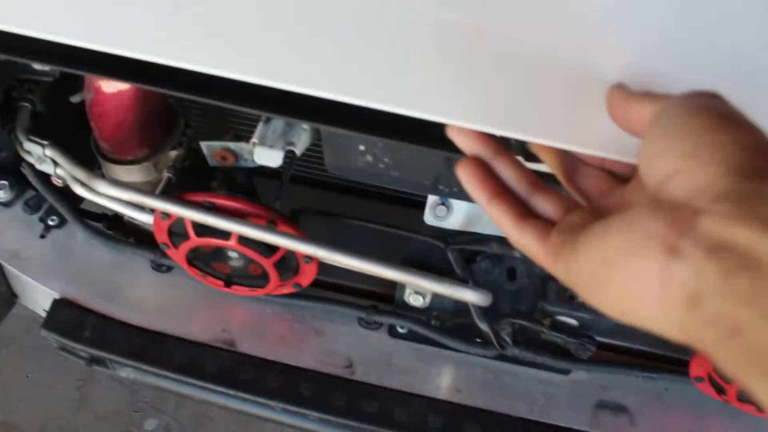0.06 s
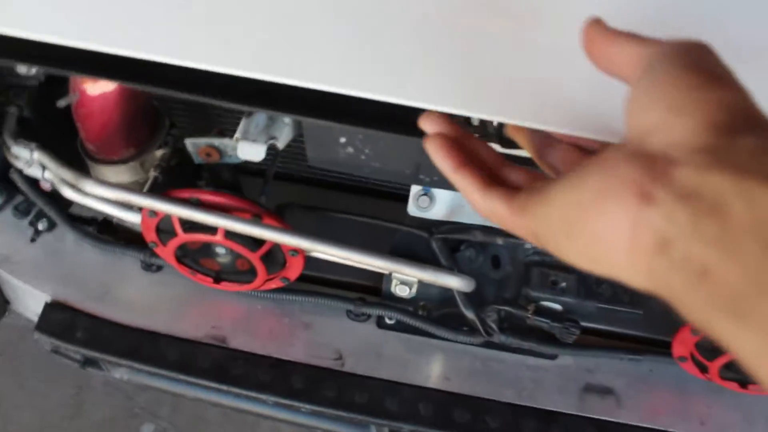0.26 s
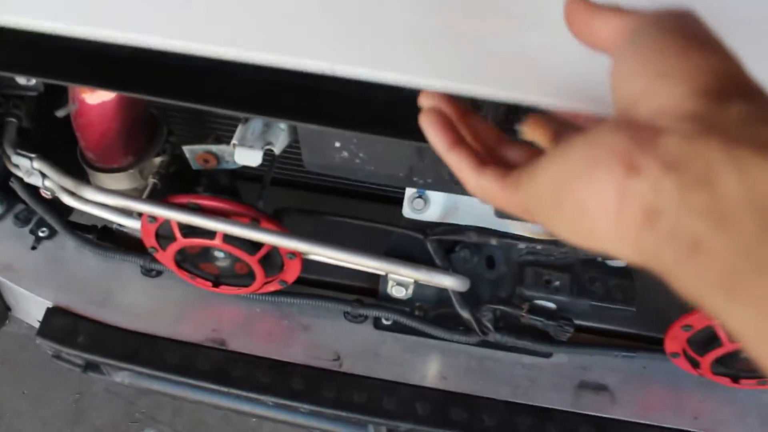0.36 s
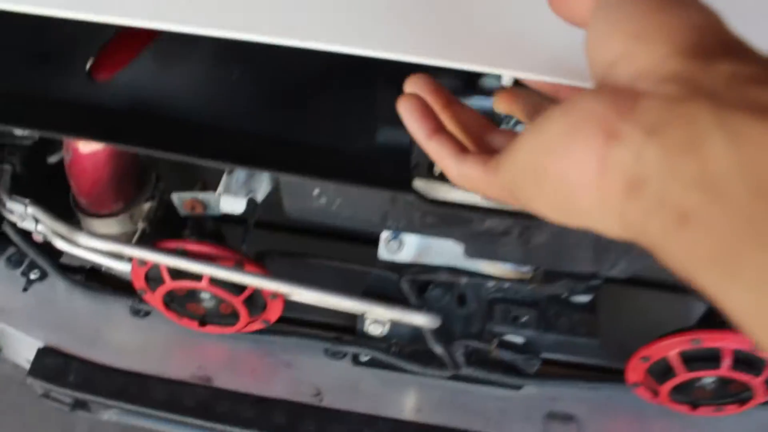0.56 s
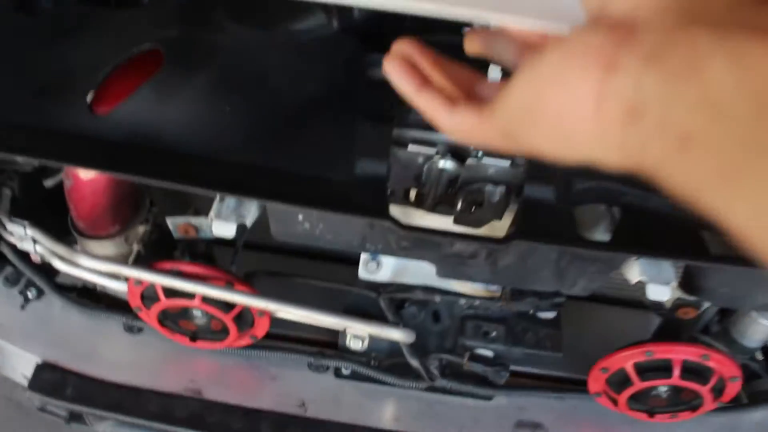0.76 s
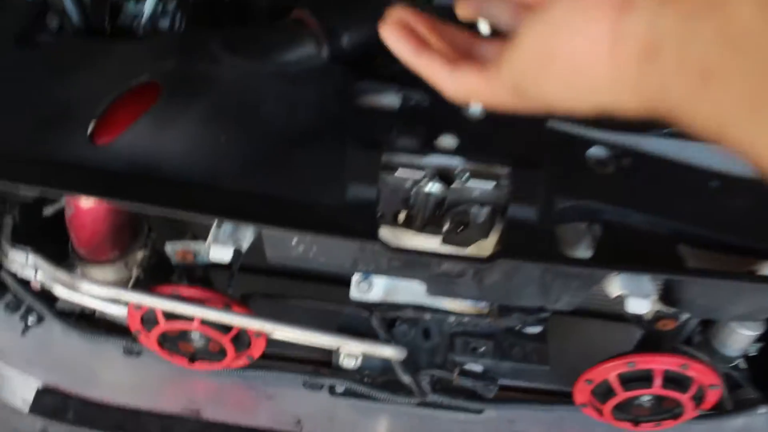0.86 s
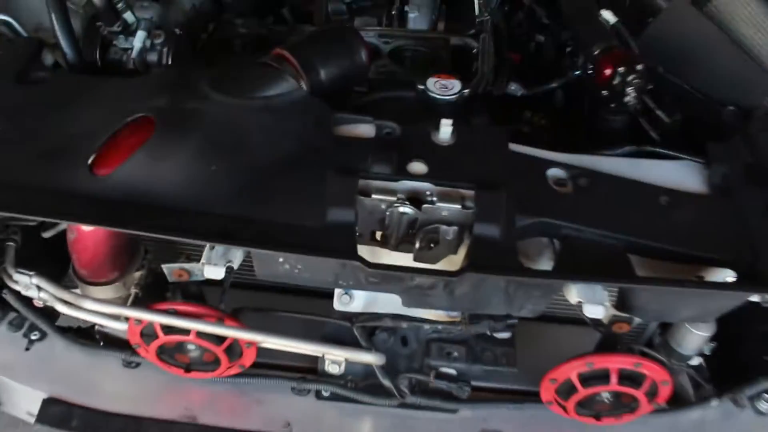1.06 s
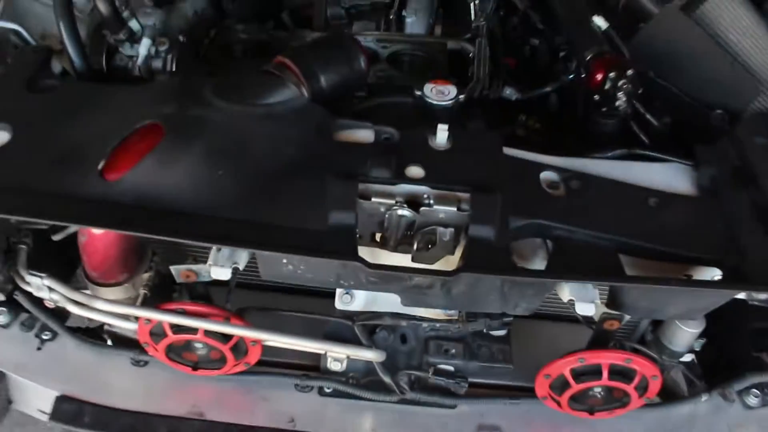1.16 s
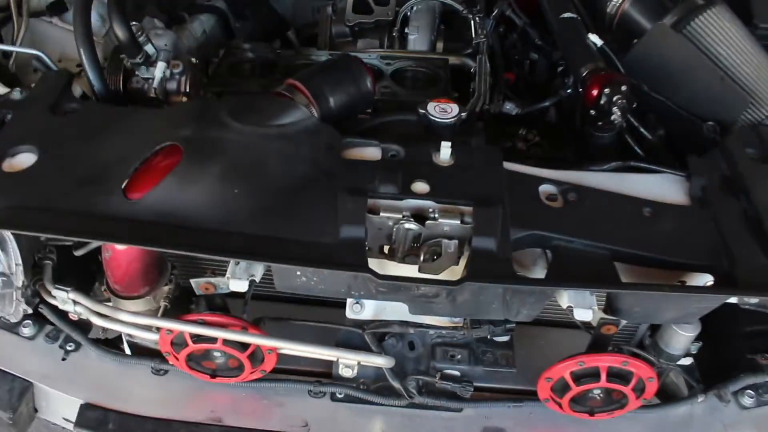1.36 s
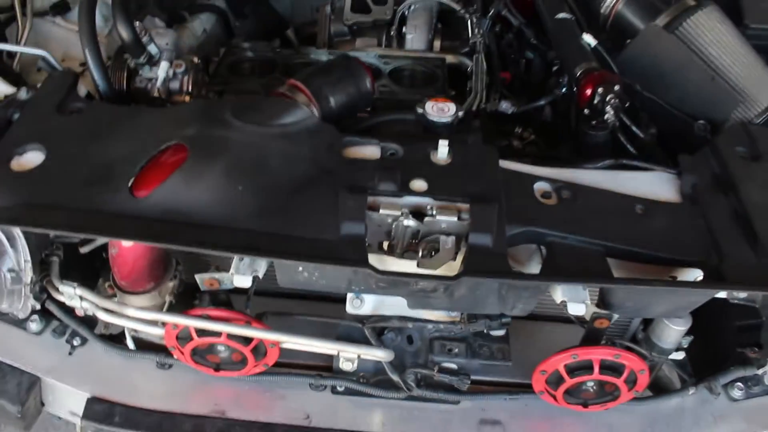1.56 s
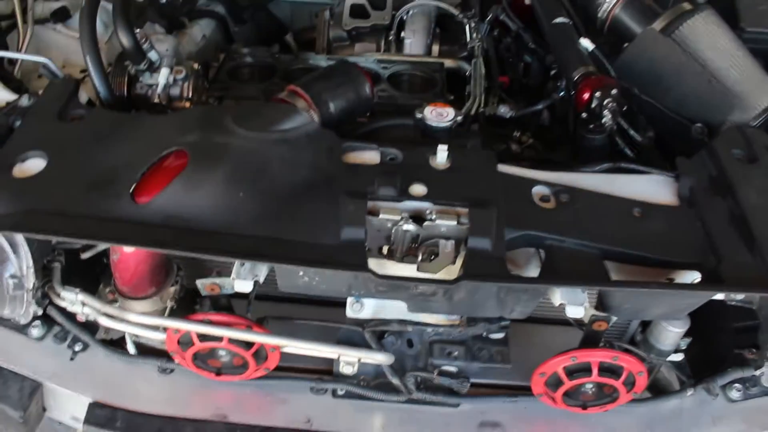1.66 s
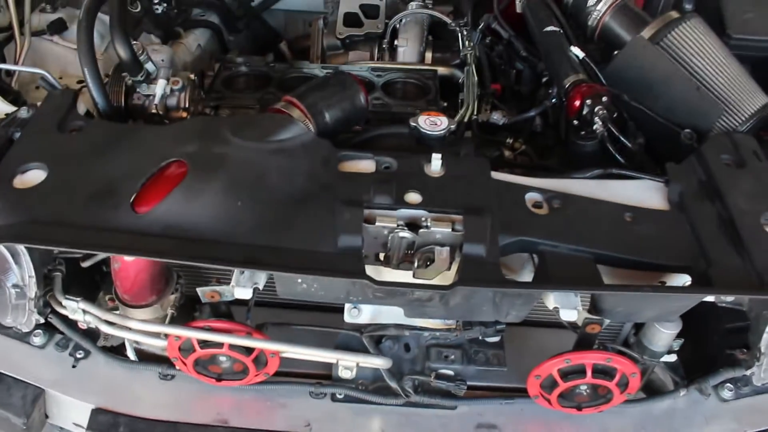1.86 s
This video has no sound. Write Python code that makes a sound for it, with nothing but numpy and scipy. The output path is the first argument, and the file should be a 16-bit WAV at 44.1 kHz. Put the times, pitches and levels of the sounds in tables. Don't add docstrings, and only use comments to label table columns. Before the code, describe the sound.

Close stereo microphone by an engine bay: a small chattering metal click, a hard hook snap that shakes the panel, light knocks back, then soft whistling gas from a strut over a quiet traffic rumble.

```python
import sys
import numpy as np
from scipy import signal
from scipy.fft import rfft, irfft
from scipy.io import wavfile
from scipy.ndimage import uniform_filter1d

SR = 44100
rng = np.random.default_rng(int(sys.argv[2]) if len(sys.argv) > 2 else 0)


def undo_db(level):
    steps = np.asarray(level, float) / 20
    return 10 ** steps


def log_audio(samples):
    frames = np.atleast_2d(samples).T
    limited = np.clip(frames, -1, 1)
    pcm = np.round(limited * 32767).astype(np.int16)
    wavfile.write(sys.argv[1], SR, pcm)


N = 83790

# start in seconds, level in dB, extra crack level in dB.
LEVER_HITS = [
    (.1533, -23.5, -0.5),
    (.1548, -18, -4),
    (.1568, -18, 1),
    (.1602, -23.5, -1.5),
    (.1635, -28, -6),
    (.168, -23, -6),
    (.178, -30.5, -27),
    (.198, -32, -18),
]
# start in seconds, level in dB, extra crack level in dB.
HOOK_HITS = [
    (.3858, -24, 11.5),
    (.3863, -2.5, -1.9),
    (.3878, -4, 1),
    (.3906, -6.5, -8),
    (.3958, -12.5, -12),
    (.3995, -18.5, -7),
]
# start in seconds, level in dB, extra crack level in dB.
REBOUND_HITS = [
    (.4462, -35, -8),
    (.4578, -24, 2),
    (.4605, -33, 4),
    (.4645, -33, -3),
    (.468, -24, -2),
    (.473, -31, -5),
]
# pitch in Hz, level in dB, time to fall 60 dB in seconds.
LEVER_MODES = [(810, 1, 0.076), (380, 3.5, 0.08), (516, 0.5, 0.043), (660, -4.5, 0.18), (1047, -1.5, 0.12),
               (1080, -21, .11), (1235, -3, 0.13), (1460, -7.5, 0.13), (1760, -6, 0.15), (2040, -1, 0.065),
               (2220, 5, 0.063), (2754, -13.5, .1), (3520, -1.5, .07), (4340, -21, .05)]
# pitch in Hz, level in dB, time to fall 60 dB in seconds.
HOOK_MODES = [(195, -10, .06), (247, -10.5, 0.088), (429.5, -3, 0.13), (544, 7.5, 0.031), (640, 6, 0.028),
              (816, 3.5, 0.041), (1080, -30, 0.061), (1400, -8.5, 0.067), (1640, -18, 0.034),
              (1955, 4.5, 0.054), (2130, -10.5, 0.031), (3530, -11, 0.056), (5910, 0, 0.01),
              (8070, -4, 0.019)]
# frequency in Hz, level in dB per Hz.
LEVER_CRACK = [(150, -41), (300, -24), (461, -2), (2270, -6), (3050, -23), (3540, -5), (6560, -25),
               (9610, -31.5), (13000, -67)]
# frequency in Hz, level in dB per Hz.
HOOK_CRACK = [(200, -36), (900, -11), (2000, -5.5), (2830, -10.5), (4500, 0.5), (11000, -9.5), (12500, -17),
              (16500, -36)]
# frequency in Hz, level in dB per Hz.
REBOUND_CRACK = [(200, -40), (900, -9), (2000, -4), (4500, -4), (6200, 0), (9500, -7), (11500, -20),
                 (13500, -60)]
# frequency in Hz, level in dB per Hz.
LEVER_RATTLE = [(290, -20), (420, 4), (2200, -1.5), (2800, -11), (3600, -9), (5400, -9.5), (6100, -30),
                (13000, -59)]
# frequency in Hz, level in dB per Hz.
HOOK_RATTLE = [(100, -36), (450, 7), (2200, -2), (2800, -17), (3600, -12.5), (5500, -11.5), (7000, -29),
               (15000, -65)]
# pitch in Hz, level in dB, time to fall 60 dB in seconds.
TICK_MODES = [(397, -31, 0.038), (5600, -49.5, 0.017), (4930, -54, .015)]
# time in seconds, pressure in dB.
SCRAPE_PRESSURE = [(.29, -82), (0.309, -56), (.34, -64), (0.343, -43.5), (0.384, -31.5), (.42, -28),
                   (.44, -27.5), (.465, -25.5), (.5, -31), (.54, -39), (0.602, -64)]
# frequency in Hz, level in dB per Hz.
SCRAPE_TONE = [(35, -61), (60, -20), (470, 6.5), (700, 3), (1560, -10), (2150, -10), (4840, -19.5),
               (6090, -25.5), (15000, -66)]
# pitch in Hz, width in Hz, level in dB.
PANEL_MODES = [(248.8, 27.5, 6.5), (356, 62, -4), (431.4, 38, 7), (504, 70, -8), (647, 94, -7),
               (980, 120, -4.5), (1383, 49, -16), (1840, 200, -6.5), (3550, 340, -30)]
# time in seconds, jet level in dB, then shrinking and growing chamber in dB over the jet.
GAS_FLOW = [(0.549, -88, -6, -20), (.75, -69, -6, -24), (.97, -67.5, -9.5, -21), (1.12, -74.5, -1, -7),
            (1.21, -73.5, -3.5, 4), (1.26, -73, 1, 0), (1.31, -73, -0.5, -14), (1.42, -69, -0.5, -10),
            (1.6, -63, -9, -7), (1.65, -65, -8.5, -4.5), (1.8, -63.5, -9.5, -1.5), (1.9, -62.5, -2, -4)]
# time in seconds, shrinking chamber in Hz, its overtone spacing in Hz,
# growing chamber in Hz.
PISTON = [(.6, 1950, 1950, 3600), (1.0, 2090, 2090, 3000), (1.15, 2250, 2250, 2780),
          (1.2, 2290, 2290, 2690), (1.27, 2380, 2350, 2430), (1.4, 2700, 2560, 2500),
          (1.5, 2950, 2750, 2330), (1.6, 3280, 2960, 2190), (1.66, 3450, 3180, 2090),
          (1.72, 3700, 3550, 2010), (1.8, 4060, 4000, 1880), (1.86, 4520, 4450, 1790),
          (1.9, 4850, 4750, 1740)]
# time in seconds, second in dB, third in dB.
VALVE = [(.9, -1, -6), (1.05, 2, -6), (1.17, 5, -6), (1.23, -10, -3), (1.33, -3, -3), (1.42, -2, -2),
         (1.5, -1, 2), (1.56, -12, 4), (1.61, -9, 5), (1.63, 8, 0), (1.68, 4, 1), (1.72, -1, -2),
         (1.76, 4, -8), (1.81, -2, -12), (1.86, 1, -12), (1.9, 2, -12)]
# frequency in Hz, level in dB per Hz.
JET_TONE = [(500, -9.5), (1200, 3.5), (3000, -3.5), (7500, -5.5), (10000, -8.5), (13000, -13), (16000, -47)]
# frequency in Hz, level in dB.
STRUT_BODY = [(1800, 2), (3000, -1), (4400, 2), (5800, -5), (6800, 1), (8800, 0), (10500, -5), (14000, -22)]
# frequency in Hz, level in dB per Hz.
BRUSH_TONE = [(1500, -21), (4000, 2), (8000, 0), (11000, -5), (15500, -26), (16000, -50)]
# frequency in Hz, left minus right in dB.
LEFT_OVER_RIGHT = [(200, -1), (1000, -1), (2000, -3.5), (4000, -0.7), (12000, 1)]
# frequency in Hz, side minus middle in dB.
PORT_SPREAD = [(100, -43), (500, -20), (1500, -17), (4000, -9), (8000, -8), (12000, -2)]
# frequency in Hz, time to fall 60 dB in seconds.
BAY_DECAY = [(200, 0.93), (700, 0.42), (2000, 0.53), (5000, 0.4), (12000, 0.21)]
# frequency in Hz, level in dB per Hz.
TRAFFIC_TONE = [(12, -76), (20, -32), (91, -6.5), (342, -15.5), (506, -18), (729, -18), (4410, -36.5),
                (15700, -47.5), (15950, -78)]
# frequency in Hz, left-right likeness from -1 to 1.
TRAFFIC_LIKENESS = [(60, 1), (180, 0.91), (550, 0.78), (1650, 0.11), (4970, 0.34), (15000, -0.26)]
# pitch in Hz, width in Hz, level in dB.
ENGINES = [
    (87, 26, -50),
    (122, 30, -53),
    (197.3, 56, -56.5),
]


def evened(x):
    return x / np.sqrt(np.mean(x ** 2) + 1e-20)


def read(points, hz):
    f, value = np.transpose(points)
    return np.interp(np.log(hz + 1), np.log(f + 1), value)


def curves(table, outside=None):
    seconds, *columns = np.transpose(table)
    return [np.interp(np.arange(N) / SR, seconds, c, outside, outside) for c in columns]


def colour(x, points):
    log_gain = np.log(undo_db(read(points, abs(np.fft.fftfreq(4096, 1 / SR)))))
    taps = np.fft.ifft(np.exp(np.conj(signal.hilbert(log_gain)))).real[:2048]
    return signal.oaconvolve(x, taps / np.linalg.norm(taps))[:len(x)]


def resonate(x, hz, width_hz):
    turn = np.exp(2j * np.pi * np.cumsum(hz * np.ones(len(x))) / SR)
    r = np.exp(-np.pi * width_hz / SR)
    return 2 * (turn * signal.lfilter([1 - r], [1, -r], x / turn + 1e-18)).real


def fuzzy_tone(x, hz, width_hz, second_width_hz):
    return evened(resonate(resonate(x, hz, width_hz), hz, second_width_hz))


def strikes(hits, modes, crack, rattle, rattle_t60, modes_db, crack_db, rattle_db):
    t, out = np.arange(SR // 2) / SR, np.zeros(N)
    for start_s, level_db, extra_crack_db in hits:
        ring = 0
        for hz, db, t60 in modes:
            louder, sharper = rng.standard_normal(2)
            wave = np.sin(2 * np.pi * hz * (1 + 0.0035 * sharper) * t)
            fade_s = min(t60, 240 / hz)
            ring = ring + undo_db(db + 1.6 * louder - 60 * t / fade_s) * wave
        ring = undo_db(modes_db) * np.minimum(t / 0.00025, 1) * ring / 2
        crack_fade = undo_db(crack_db + extra_crack_db - 60 * t / 0.02)
        snap = colour(crack_fade * rng.standard_normal(len(t)), crack)
        rattle_fade = undo_db(rattle_db - 60 * t / rattle_t60) * np.minimum(t / 0.0015, 1)
        shake = colour(rattle_fade * rng.standard_normal(len(t)), rattle)
        at = round(start_s * SR)
        out[at:at + len(t)] += undo_db(level_db) * (ring + snap + shake)
    return signal.sosfilt(signal.butter(3, 170, "high", fs=SR, output="sos"), out)


def lever():
    return strikes(LEVER_HITS, LEVER_MODES, LEVER_CRACK, LEVER_RATTLE, 0.15,
                   modes_db=-9.5, crack_db=-2, rattle_db=-11.5)


def hook(hits, crack):
    return strikes(hits, HOOK_MODES, crack, HOOK_RATTLE, 0.11, modes_db=-9, crack_db=-10, rattle_db=-14.5)


def scrape():
    slips_per_s = 9000
    slip_size = undo_db(1.5 * np.minimum(rng.exponential(1, N), 2)) * rng.standard_normal(N)
    slips = slip_size * (rng.random(N) < slips_per_s / SR)
    panel = sum(undo_db(db) * fuzzy_tone(slips, hz, width, 4 * width) for hz, width, db in PANEL_MODES)
    sound = evened(colour(slips, SCRAPE_TONE)) + undo_db(-4.5) * evened(panel)
    pressure_db, = curves(SCRAPE_PRESSURE, outside=-120)
    return undo_db(pressure_db) * sound


def tick():
    t = np.maximum(np.arange(N) / SR - 0.3145, 0)
    return sum(undo_db(db - 60 * t / t60) * np.sin(2 * np.pi * hz * t) for hz, db, t60 in TICK_MODES)


def flutter():
    size = round(0.025 * SR)
    wander = uniform_filter1d(uniform_filter1d(rng.standard_normal(N), size), size)
    return undo_db(2.0 * evened(wander))


def chamber(gas, first_hz, spacing_hz, width_hz, overtones_db):
    song = 0
    for k, db in enumerate(overtones_db, 1):
        hz = first_hz if k == 1 else k * spacing_hz
        tone = fuzzy_tone(gas, hz, k * k * width_hz, 2 * k * (k + 1) * width_hz)
        song = song + undo_db(db) * flutter() * tone
    return colour(song, STRUT_BODY)


def strut():
    t = np.arange(N) / SR
    short_hz, spacing_hz, long_hz = curves(PISTON)
    flow_db, short_db, long_db = curves(GAS_FLOW)
    second_db, third_db = curves(VALVE)
    short_gas, long_gas, jet_gas, nozzle_gas = rng.standard_normal((4, N))

    short = chamber(short_gas, short_hz, spacing_hz, 65, (0, second_db, third_db, -8))
    long = chamber(long_gas, long_hz, long_hz, 14, (0, -14, -18, -14, -4))
    chambers = undo_db(short_db) * short + undo_db(long_db) * long

    whistle = np.sin(2 * np.pi * np.cumsum(long_hz) / SR) * flutter() ** .5
    whistle = undo_db(4) * np.clip((t - 1.58) / 0.2, 0, 1) * whistle
    octave = undo_db(1.5) * fuzzy_tone(long_gas, 2 * long_hz, 50, 150)
    groan = undo_db(8) * fuzzy_tone(nozzle_gas, 1190, 120, 240)
    late = np.clip((t - 1.78) / 0.1, 0, 1) * (octave + groan)

    nozzle_open = np.clip((t - 1.625) / .03, 0, 1)
    nozzle = undo_db(1.5) * nozzle_open * fuzzy_tone(nozzle_gas, 7000, 500, 1500)
    jet = undo_db(4.5) * colour(jet_gas, JET_TONE)
    return undo_db(flow_db) * (chambers + whistle + late + nozzle + jet)


def brush():
    fade = undo_db(-63 - 60 * np.arange(N) / SR / 0.97)
    return colour(fade * rng.standard_normal(N), BRUSH_TONE)


def ports(x):
    hz = np.fft.rfftfreq(N, 1 / SR)
    tilt = undo_db(read(LEFT_OVER_RIGHT, hz) / 2)
    scatter = rng.standard_normal(256) * undo_db(-60 * np.arange(256) / 256)
    scatter = rfft(scatter / np.linalg.norm(scatter), N)
    sound = rfft(x)
    side = irfft(sound * scatter * undo_db(read(PORT_SPREAD, hz)), N)
    return np.array([irfft(sound * tilt, N) + side, irfft(sound / tilt, N) - side])


def bay(x):
    taps = np.zeros((2, SR // 2))
    at = np.arange(100, SR // 2 - 20, 20)
    at = at + rng.integers(0, 20, (2, len(at)))
    np.put_along_axis(taps, at, rng.choice([-1., 1.], at.shape), 1)
    taps = taps[0] + 0.35 * (taps - taps[0])
    hz, t, z = signal.stft(taps, SR, nperseg=256)
    fade = undo_db(-60 * t / read(BAY_DECAY, hz)[:, None])
    tail = signal.istft(z * fade, SR, nperseg=256)[1]
    return signal.fftconvolve(x[None], tail / np.linalg.norm(tail[0]), axes=1)[:, :N]


def street():
    frames, hz = N // 256 + 5, np.fft.rfftfreq(1024, 1 / SR)
    a, b, c, d, patches = rng.standard_normal((frames, 513, 5)).T
    patches = evened(uniform_filter1d(uniform_filter1d(patches, 12, 0), 14, 1))
    same = np.clip(read(TRAFFIC_LIKENESS, hz), -1, 1)[:, None]
    left = a + 1j * b
    right = same * left + np.sqrt(1 - same ** 2) * (c + 1j * d)
    z = np.array([left, right]) * undo_db(read(TRAFFIC_TONE, hz)[:, None] + 0.89 * patches)
    wash = undo_db(-46) * evened(signal.istft(z, nperseg=1024, noverlap=768)[1][:, :N])
    engines = sum(undo_db(db) * fuzzy_tone(rng.standard_normal(N), f, width, width) for f, width, db in ENGINES)
    left, right = wash + engines
    return np.array([np.roll(left, 4), right])


def scene():
    latch = lever() + hook(HOOK_HITS, HOOK_CRACK) + hook(REBOUND_HITS, REBOUND_CRACK) + scrape() + tick()
    near = latch + strut() + brush()
    return ports(near) + undo_db(-13) * bay(near) + street()


def top_cut(x):
    return signal.sosfilt(signal.butter(12, 16790, fs=SR, output="sos"), x)


def record(dry):
    low_pass = signal.firwin(255, 16300, window=("kaiser", 9), fs=SR)
    mix = signal.oaconvolve(np.clip(dry, -0.94, 0.94), low_pass[None], "same")
    return top_cut(mix)


dry = scene()
out = record(dry)
log_audio(out)
```